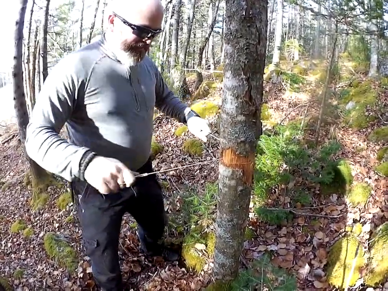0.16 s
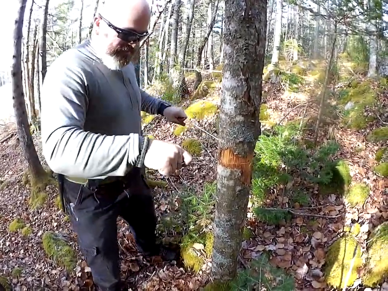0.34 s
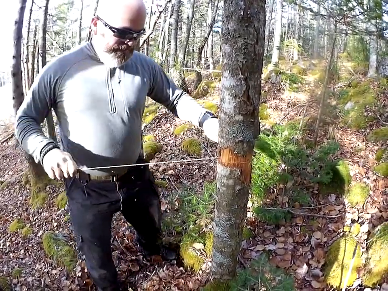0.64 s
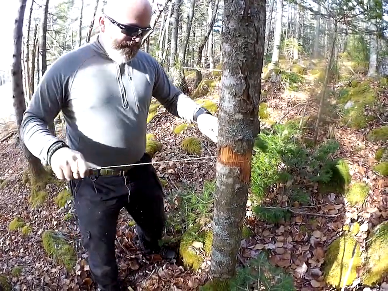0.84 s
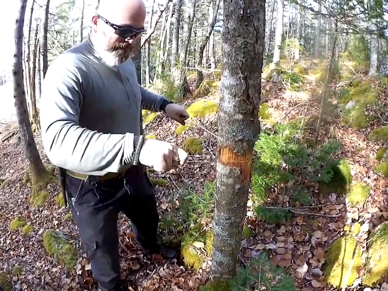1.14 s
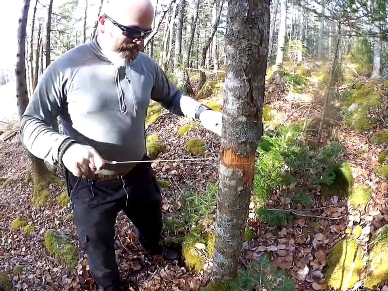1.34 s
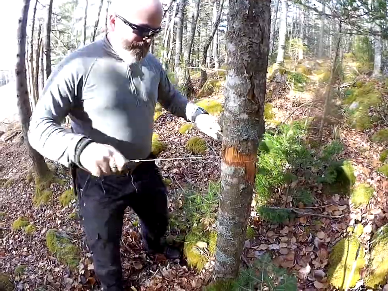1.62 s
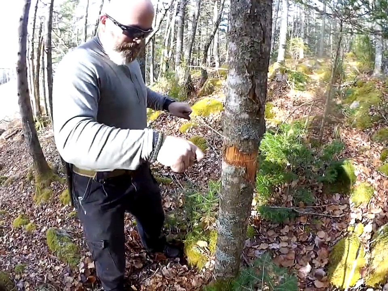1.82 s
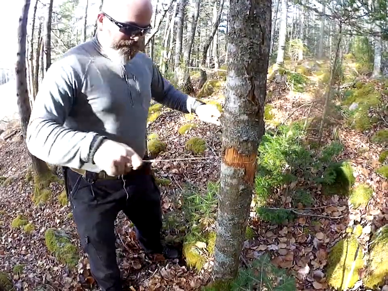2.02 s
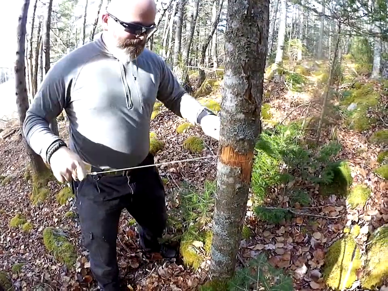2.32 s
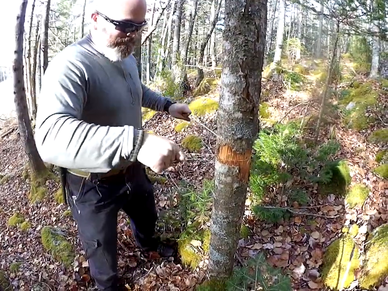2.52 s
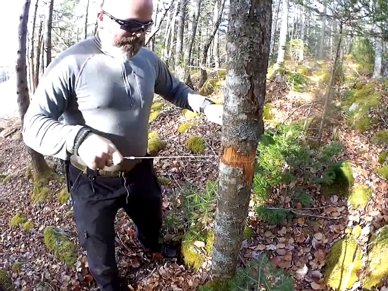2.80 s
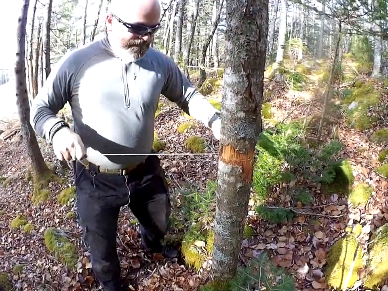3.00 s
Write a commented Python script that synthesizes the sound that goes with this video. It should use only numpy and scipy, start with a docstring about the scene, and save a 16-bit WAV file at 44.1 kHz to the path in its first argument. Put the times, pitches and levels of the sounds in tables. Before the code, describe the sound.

Close, thin-sounding rasping of a wire saw in wood: short gritty strokes from alternating hands, brief near-silent gaps, occasional chirps and a snap, over faint hiss in a quiet, echoless wood.

```python
"""Wire saw on a thin trunk

A wire saw is pulled back and forth around a thin trunk in a quiet wood, near a small microphone.
Each pull is a pulse train of teeth whose rate rises and falls with the wire's speed, over the random
grit of torn fibres. Snaps are decaying modes with a scratch, ticks are bright noise bursts, catches are
short gliding whistles, and a thud of low resonant noise marks the bite. Filtered noise gives the hiss."""
import sys
import numpy as np
from scipy import signal
from scipy.fft import rfft, irfft
from scipy.io import wavfile
from scipy.ndimage import uniform_filter1d

SR = 44100
rng = np.random.default_rng(int(sys.argv[2]) if len(sys.argv) > 2 else 0)


def voltage_ratio(level):
    """Linear amplitude factor for a level in decibels (scalar or array-like)."""
    return 10 ** (np.asarray(level, float) / 20)


def unload_wav(signal):
    """Save mono or channel-first audio to the path in sys.argv[1] as 16-bit WAV at rate SR, clipped to [-1, 1]."""
    wavfile.write(
        sys.argv[1],
        SR,
        np.round(np.clip(np.atleast_2d(signal).T, -1, 1) * 32767).astype(np.int16),
    )


N = 138915  # length in samples

# Pulls of the wire: start_s, length_s, full_speed_teeth_per_s, thud_db (as the wire bites)
PULLS = [(0.063, 0.27, 1400, -71), (.415, 0.29, 1410, -85), (0.796, 0.32, 1450, -72.5),
         (1.178, 0.27, 1410, -76.5), (1.547, 0.29, 1405, -71), (1.922, 0.29, 1490, -79),
         (2.307, .28, 1400, -70.5), (2.683, .28, 1360, -69), (3.067, 0.24, 1550, -65.5)]
# Level of the rasp, one list of points for each pull: time_s, level_db
RASP_LEVELS = [
    [(.05, -68), (.072, -64), (.086, -51.5), (.26, -49), (.312, -51.5), (.326, -58), (.345, -88)],
    [(.415, -64), (.425, -60.5), (.449, -47), (.56, -43), (.647, -43), (.673, -47.5), (.7, -73)],
    [(.79, -65), (.814, -53.5), (.86, -50), (1.008, -48.5), (1.028, -44.5), (1.078, -56), (1.105, -86)],
    [(1.17, -69), (1.194, -53.5), (1.236, -45.5), (1.382, -42.5), (1.43, -50.5), (1.46, -72)],
    [(1.535, -69), (1.555, -59), (1.587, -49.5), (1.773, -44), (1.793, -44.5), (1.817, -63), (1.835, -85)],
    [(1.924, -64), (1.952, -45.5), (2.012, -46.5), (2.13, -39.5), (2.174, -45), (2.198, -54.5),
     (2.222, -81)],
    [(2.305, -70.5), (2.34, -48.5), (2.43, -46.5), (2.518, -46.5), (2.554, -49), (2.575, -65.5),
     (2.595, -82)],
    [(2.68, -72), (2.7, -54), (2.742, -43.5), (2.8, -43.5), (2.9, -38), (2.942, -51), (2.965, -80)],
    [(3.07, -77), (3.079, -55.5), (3.131, -42.5), (3.165, -53)],
]
# Colour of wood and wire for the pulls of each hand: frequency_hz, gain_db
LEFT_HAND_COLOUR = [(120, -41), (283, -15), (450, -22.5), (885, -13), (1150, -9.5), (1360, -2.5),
                    (1670, -7.5), (2090, -3), (2700, -3.5), (3530, -4.5), (4450, 0), (6500, -6),
                    (12000, -4.5)]
RIGHT_HAND_COLOUR = [(120, -42), (270, -22), (500, -23.5), (990, -14), (1260, -1.5), (1670, -7), (1850, 1),
                     (2150, 0.5), (3250, -2), (3730, -3), (4500, -2), (6500, -5), (12000, -2.5)]
# Share of a swell in level that each band does not follow: frequency_hz, share
SWELL_LAG = [(200, 0), (700, 0), (1300, 0.59), (3000, 0.56), (4300, 0.55), (9000, 0.75)]
# Wire snaps into the kerf: start_s, level_db, scratch_t60_s, share_of_full_ring_time
SNAPS = [(1.918, -41, 0.018, .45), (3.0385, -41, .04, 1.05)]
# Modes that ring in a snap: frequency_hz, relative_level_db, full_t60_s
SNAP_MODES = [(330, -13, 0.033), (1100, -8, 0.035), (1750, 3.5, 0.024), (2320, 3, .04), (3200, -7, 0.028),
              (4620, -10, 0.022)]
# Thin ticks: start_s, nominal_level_db, centre_hz
TICKS = [(0.093, -42, 7060), (0.346, -45.5, 9700), (.398, -46.5, 7600), (.424, -33, 6800)]
# The wire catches and chirps: centre_s, pitch_hz, level_db, half_length_s, pitch_change_share (centre to end)
CATCHES = [(0.58, 2017, -43, 0.008, 0), (0.614, 1777, -39, 0.02, -0.14), (0.653, 2032, -41, 0.023, -0.33),
           (0.653, 1046, -49.5, 0.017, -0.285), (0.816, 1276, -51, .016, -0.064),
           (0.884, 1425, -51.5, .025, -0.11), (1.027, 2114, -47, 0.01, -.04), (1.031, 1192, -51, 0.027, 0),
           (1.248, 1224, -50.5, 0.029, .08), (1.265, 2350, -42.5, .006, -0.13),
           (1.396, 2020, -42.5, .02, -0.1), (1.97, 2030, -36, 0.0051, 0.049),
           (2.739, 2130, -42, 0.02, -0.12), (2.846, 2015, -42.5, 0.019, 0.012),
           (2.879, 1374, -39.5, 0.021, -.08), (2.917, 1907, -39, 0.014, 0.024),
           (3.125, 1900, -43, 0.0045, .05)]
# Spectrum of the steady hiss: frequency_hz, relative_density_db
HISS_COLOUR = [(25, -44), (125, -10), (220, -8), (870, -9.5), (1400, -9), (1800, -11.5), (2300, -13),
               (3800, -13), (4700, -12), (5600, -32), (6500, -26.5), (8600, -21), (10500, -25),
               (12500, -34), (15200, -43), (16000, -50)]
# Likeness of the hiss at left and right: frequency_hz, correlation
HISS_LIKENESS = [(60, 0.46), (300, 0.77), (4700, 0.19), (9000, .1)]
# Lean of the hiss, left minus right: frequency_hz, level_difference_db
HISS_LEAN = [(60, 0), (1600, -2.5), (4700, 0.5)]
# Likeness of the sawing at left and right: frequency_hz, correlation
SAW_LIKENESS = [(250, 1), (1500, 0.98), (3000, 0.9), (4500, 0.59), (8000, 0.19)]
# Lean of the sawing, left minus right: frequency_hz, level_difference_db
SAW_LEAN = [(160, -8.5), (260, -3.5), (420, -2.5), (680, 2), (1110, -8.5), (1800, -3.5), (2930, 1),
            (4770, 0.5), (8000, 4), (12000, -4)]
# Phase by which left leads right, for sawing and hiss: frequency_hz, phase_rad
PHASE_LEAD = [(520, 0.085), (950, -0.56), (1210, 0.38), (1640, 0.47), (2670, 0.32), (3010, -0.83),
              (3530, -0.55), (4570, 0.6)]
# Microphone: thin bass, a steep step down above the mids: frequency_hz, gain_db
MICROPHONE = [(20, -18), (60, -8), (130, -0.5), (4750, 2), (5300, -13.5), (5850, -18.5), (6700, -12),
              (7600, -14), (8900, -12.5), (10800, -16), (12300, -31), (15200, -64), (16000, -73)]

# Speed arch of a pull: shares of full speed at its two ends, exponent of the arch, skew in time
START_SPEED, END_SPEED, ARCH_POWER, SKEW = 0.18, 0.3, 0.94, 1.05
# Teeth: rms share of rate jitter, mean of the random height in dB, level against the grit in dB
JITTER_SHARE, UNEVEN_DB, TEETH_DB = 0.3, 3, -7
GRIT_PER_S, GRIT_SPREAD_DB = 6000, 2
SPLINTERS_PER_S, SPLINTER_DB = 30, 13  # rare sharp cracks
SMEAR_S = 0.00152  # rms spread in delay of the paths through wood and wire
# Tone around the edge, a share of the tooth rate: fall below it and far above it, in dB per octave
EDGE_SHARE, SLOPE_DB, DULL_DB = 0.87, 13, 6.5
HUMP_DB, HUMP_OCTAVES = 4, 0.35  # a hump near the tooth rate when the wire is slow
PATCH_DB, CLUMP_DB = 2.5, -2  # flicker of the colour in patches, and of all bands together
USUAL_DB = -44.5  # level from which a swell is counted
TRUNK_LIFT_DB = 8.5  # per octave below the full tooth rate, where the trunk answers more
THUD_HZ, THUD_WIDTH_HZ, THUD_RISE_S = 273, 66, 0.024
SCRATCH_DB, SCRATCH_HZ, SCRATCH_WIDTH_HZ = 6, 2200, 2000
TICK_T60_S, TICK_WIDTH_HZ = 0.0053, 4300
CATCH_WOBBLE_SHARE = 0.025
HISS_DB = -70.5
RUSTLE_DB, RUSTLE_END_S, RUSTLE_HZ, RUSTLE_WIDTH_HZ = -71, 0.18, 4020, 1300
NOTCH_HZ, NOTCH_WIDTH_HZ, NOTCH_DB = 7980, 108, -33
STFT_HZ = np.fft.rfftfreq(512, 1 / SR)


def evened(x):
    """Normalisation: scales a signal to unit rms."""
    return x / np.sqrt(np.mean(abs(x) ** 2) + 1e-20)


def read(points, hz):
    """Interpolation of a curve along a logarithmic frequency axis."""
    f, value = np.transpose(points)
    return np.interp(np.log(hz + 1), np.log(f + 1), value)


def add(mix, start_s, sound):
    """Superposition: adds a sound into the mix at its start."""
    part = mix[round(start_s * SR):][:len(sound)]
    part += sound[:len(part)]


def coloured(x, gain):
    """Linear filtering by a gain given on the FFT grid of x."""
    return irfft(rfft(x) * gain, x.shape[-1])


def resonate(x, hz, width_hz):
    """Damped resonance: a two-pole filter whose bandwidth sets its decay."""
    r = np.exp(-np.pi * width_hz / SR)
    return signal.lfilter([1 - r], [1, -2 * r * np.cos(2 * np.pi * hz / SR), r * r], x)


def pair(one, other, likeness, lean, lead):
    """Partial coherence: two ports get a shared and an unrelated part, a level lean and a phase lead."""
    hz = np.fft.rfftfreq(N, 1 / SR)
    same = np.clip(read(likeness, hz), 0, 1)
    half = voltage_ratio(read(lean, hz) / 2) * np.exp(0.5j * read(lead, hz))
    shared = np.sqrt((1 + same) / 2) * rfft(one)
    unrelated = np.sqrt((1 - same) / 2) * rfft(other)
    return irfft(np.array([(shared + unrelated) * half, (shared - unrelated) / half]), N)


def hiss():
    """Filtered random noise: faint steady air and microphone hiss, and a thin band that fades out."""
    a, b, c = rng.standard_normal((3, N))
    a, b = coloured(np.array([a, b]), voltage_ratio(read(HISS_COLOUR, np.fft.rfftfreq(N, 1 / SR))))
    steady = voltage_ratio(HISS_DB) * evened(pair(a, b, HISS_LIKENESS, HISS_LEAN, PHASE_LEAD))
    band = evened(resonate(resonate(c, RUSTLE_HZ, RUSTLE_WIDTH_HZ), RUSTLE_HZ, RUSTLE_WIDTH_HZ))
    fade = np.clip(2 - 2 * np.arange(N) / SR / RUSTLE_END_S, 0, 1)
    return steady + voltage_ratio(RUSTLE_DB) * band * fade


def ticks():
    """Impulsive excitation: brief bright bursts of resonant noise that decay exponentially."""
    out, t = np.zeros(N), np.arange(2500) / SR
    for start_s, db, hz in TICKS:
        burst = resonate(rng.standard_normal(len(t)), hz, TICK_WIDTH_HZ)
        burst = evened(resonate(burst, hz, TICK_WIDTH_HZ))
        add(out, start_s, voltage_ratio(db - 5 - 60 * t / TICK_T60_S) * burst)
    return out


def snaps():
    """Modal ringing: a snap excites decaying sine modes together with a short noise scratch."""
    out, t = np.zeros(N), np.arange(2500) / SR
    for start_s, db, scratch_t60, share in SNAPS:
        ring = np.zeros(len(t))
        for hz, mode_db, mode_t60 in SNAP_MODES:
            decay = voltage_ratio(mode_db - 60 * t / (mode_t60 * share))
            ring += decay * np.sin(2 * np.pi * (hz * t + rng.random()))
        noise = np.diff(rng.standard_normal(len(t) + 1))
        scratch = evened(resonate(noise, SCRATCH_HZ, SCRATCH_WIDTH_HZ))
        snap = evened(ring) + scratch * voltage_ratio(SCRATCH_DB - 60 * t / scratch_t60)
        attack = np.minimum(t / 0.00029, 1)
        add(out, start_s, voltage_ratio(db) * attack * snap / abs(snap).max())
    return out


def catches():
    """Frequency modulation: short unsteady whistles glide in pitch, each centred on its moment."""
    out = np.zeros(N)
    for centre_s, hz, db, half_s, change in CATCHES:
        u = np.linspace(-1, 1, round(2 * half_s * SR))
        wobble = evened(uniform_filter1d(rng.standard_normal(4000), 90))[:len(u)]
        turns = np.cumsum(hz * (1 + change * u + CATCH_WOBBLE_SHARE * wobble)) / SR
        add(out, centre_s - half_s, voltage_ratio(db) * np.cos(np.pi * u / 2) ** 2 * np.sin(2 * np.pi * turns))
    return out


def smeared(x):
    """Dispersion: delays each part of the spectrum by its own small amount, spreading clicks in time."""
    bins = len(x) // 2 + 1
    delay_s = SMEAR_S * evened(uniform_filter1d(rng.standard_normal(bins), bins // 100))
    return coloured(x, np.exp(-2j * np.pi * np.cumsum(delay_s) * SR / len(x)))


def tooth_rate(u, top):
    """Kinematics of a pull: teeth per second follow the wire's speed, an arch over progress u."""
    arch = abs(np.sin(np.pi * u)) ** ARCH_POWER
    end_share = np.where(u < 0.5, START_SPEED, END_SPEED)
    return top * (1 - (1 - end_share) * (1 - arch))


def rasp_clicks(rate):
    """Pulse excitation: uneven teeth at the given rate, random fibre grit and rare sharp cracks."""
    wobble, flip, size, chance = rng.random((4, len(rate)))
    jitter = JITTER_SHARE * evened(uniform_filter1d(wobble - 0.5, 60))
    turns = np.cumsum(rate * np.maximum(1 + jitter, 0.1)) / SR
    # one click each time the count of teeth passes a whole number
    teeth = np.diff(np.floor(turns), prepend=0) * voltage_ratio(UNEVEN_DB * -np.log(size + 0.0024))
    sign = np.sign(flip - 0.5)
    grit = sign * (chance < GRIT_PER_S / SR) * voltage_ratio(GRIT_SPREAD_DB * -np.log(size + 0.00038))
    cracks = voltage_ratio(SPLINTER_DB) * 2 * size * sign * (chance > 1 - SPLINTERS_PER_S / SR)
    return smeared(voltage_ratio(TEETH_DB) * evened(teeth - teeth.mean()) + evened(grit)) + cracks


def rasp_tone(clicks, rate, top, level):
    """Time-varying filtering: the spectrum follows the tooth rate and the swell, and flickers."""
    _, frame_s, z = signal.stft(clicks, SR, nperseg=512, noverlap=448)
    frame_rate = np.interp(frame_s, np.arange(len(rate)) / SR, rate)
    octaves = np.log2((STFT_HZ[:, None] + 1) / (EDGE_SHARE * frame_rate))
    slow = 1 - frame_rate / top
    tone_db = SLOPE_DB * np.clip(octaves, -1.2, 0) - DULL_DB * np.maximum(octaves - 1, 0)
    tone_db += HUMP_DB * slow * np.exp(-((octaves - 0.3) / HUMP_OCTAVES) ** 2)
    patches = uniform_filter1d(rng.standard_normal(z.shape), 5, axis=0)
    tone_db += PATCH_DB * evened(uniform_filter1d(patches, 8, axis=1))
    tone_db += CLUMP_DB * evened(uniform_filter1d(rng.standard_normal(len(frame_s)), 5))
    swell_db = np.maximum(np.interp(frame_s + level[0][0], *np.transpose(level)) - USUAL_DB, -6)
    tone_db -= read(SWELL_LAG, STFT_HZ)[:, None] * swell_db
    return signal.istft(z * voltage_ratio(tone_db), SR, nperseg=512, noverlap=448)[1][:len(rate)]


def thud(since_bite_s, db):
    """Resonant excitation: low noise swells and dies away after the wire bites."""
    noise = rng.random(len(since_bite_s)) - 0.5
    low = evened(np.diff(resonate(noise, THUD_HZ, THUD_WIDTH_HZ), prepend=0))
    v = np.maximum(since_bite_s, 0) / THUD_RISE_S
    return low * v * np.exp(1 - v) * voltage_ratio(db)


def pull(row, level, colour):
    """Source and filter: tooth and grit clicks are shaped by wood and wire, with a thud at the bite."""
    start, length, top, thud_db = row
    t = np.arange(level[0][0], level[-1][0], 1 / SR)
    rate = tooth_rate(np.clip((t - start) / length, 0, 1) ** SKEW, top)
    rasp = rasp_tone(rasp_clicks(rate), rate, top, level)
    hz = np.fft.rfftfreq(len(t), 1 / SR)
    trunk_db = TRUNK_LIFT_DB * np.clip(np.log2(top / (hz + 1)), 0, 1.5)
    rasp = coloured(rasp, voltage_ratio(read(colour, hz) + trunk_db))
    # the running rms is levelled, then set to the curve of this pull
    running_rms = np.sqrt(uniform_filter1d(rasp ** 2, 2600) + 1e-20)
    rasp = rasp / running_rms * voltage_ratio(np.interp(t, *np.transpose(level)))
    return t[0], (rasp + thud(t - start, thud_db)) * signal.windows.tukey(len(t), 0.04)


def saw():
    """Reciprocating motion: all pulls in turn, the hands alternating."""
    out = np.zeros(N)
    for k, (row, level) in enumerate(zip(PULLS, RASP_LEVELS)):
        add(out, *pull(row, level, (LEFT_HAND_COLOUR, RIGHT_HAND_COLOUR)[k % 2]))
    return out


def scene():
    """Superposition: two independent draws of the sawing, with the same wire sounds, form the pair."""
    wire = snaps() + ticks() + catches()
    # the second feed holds the wire sounds 30 samples later
    return pair(saw() + wire, saw() + np.roll(wire, 30), SAW_LIKENESS, SAW_LEAN, PHASE_LEAD)


def top_cut(x):
    """Nothing passes above the cut-off."""
    return signal.sosfilt(signal.butter(12, 15700, fs=SR, output="sos"), x)


def record(dry):
    """Linear reception: microphone colour, added hiss, then a narrow notch in the treble."""
    hz = np.fft.rfftfreq(N, 1 / SR)
    heard = coloured(dry, voltage_ratio(read(MICROPHONE, hz))) + hiss()
    heard = coloured(heard, voltage_ratio(NOTCH_DB * np.exp(-((hz - NOTCH_HZ) / NOTCH_WIDTH_HZ) ** 2)))
    return top_cut(heard)


dry = scene()
out = record(dry)
unload_wav(out)
```